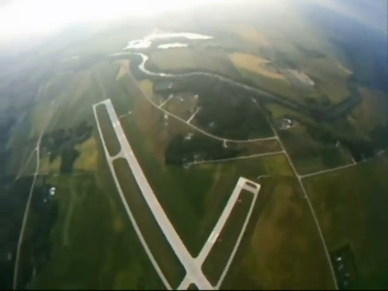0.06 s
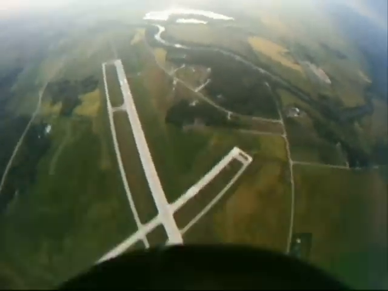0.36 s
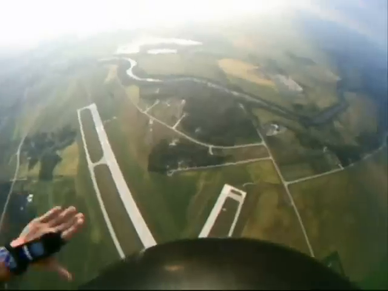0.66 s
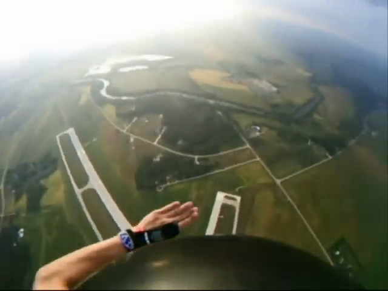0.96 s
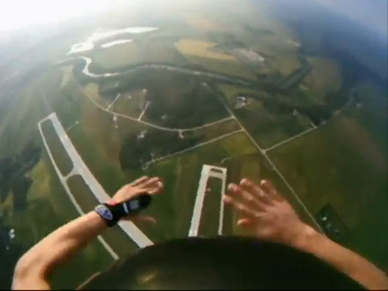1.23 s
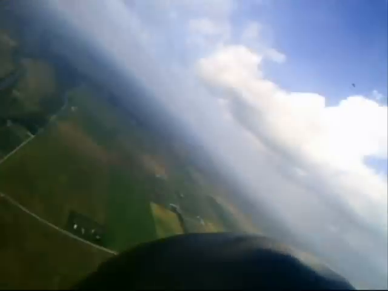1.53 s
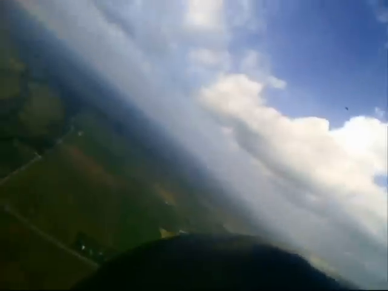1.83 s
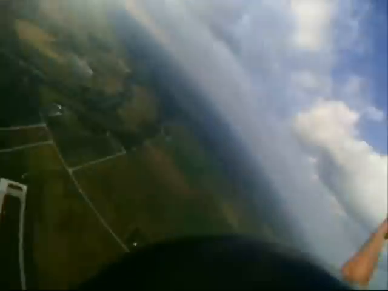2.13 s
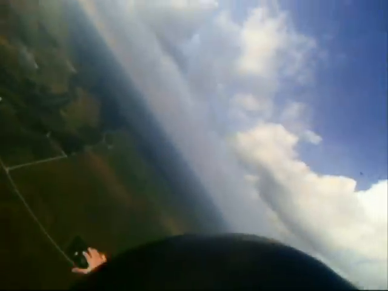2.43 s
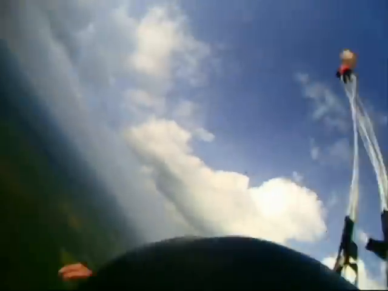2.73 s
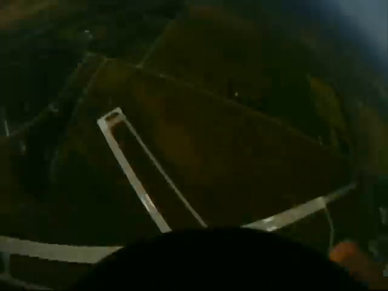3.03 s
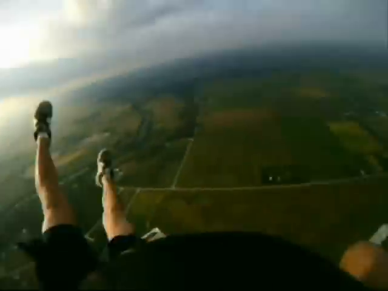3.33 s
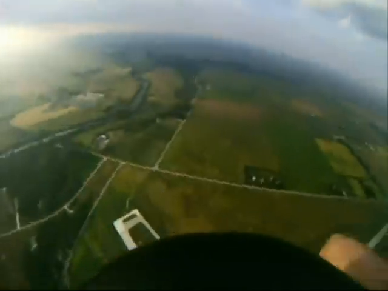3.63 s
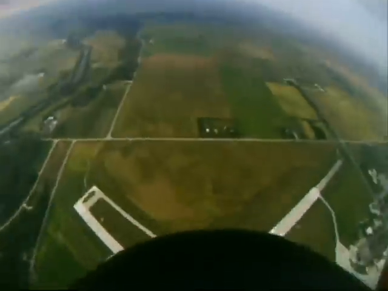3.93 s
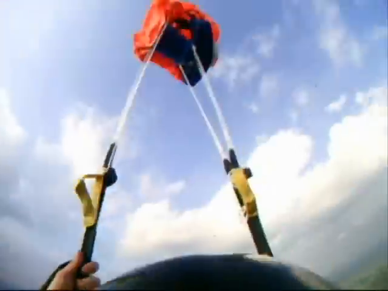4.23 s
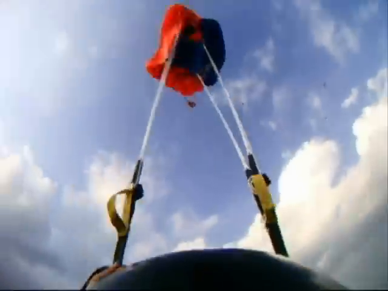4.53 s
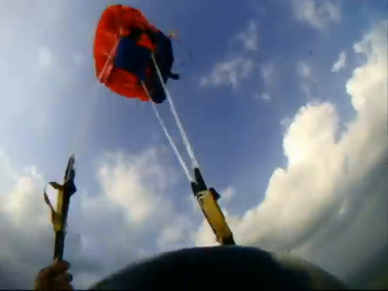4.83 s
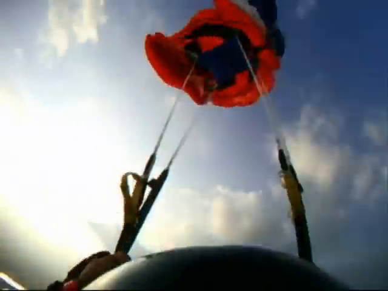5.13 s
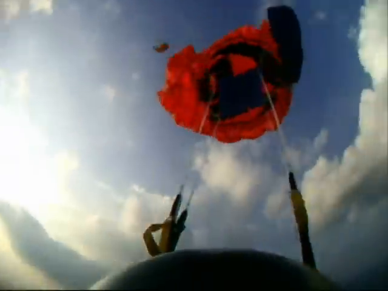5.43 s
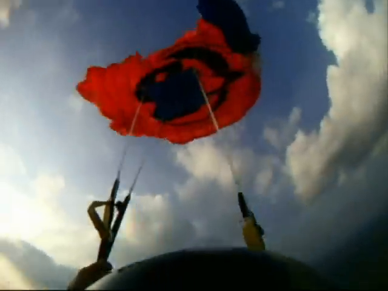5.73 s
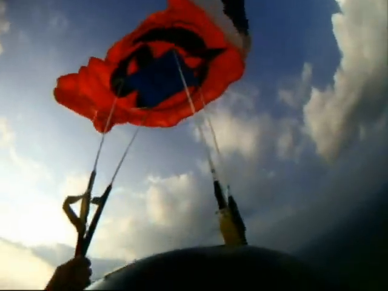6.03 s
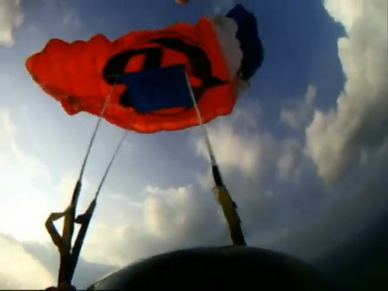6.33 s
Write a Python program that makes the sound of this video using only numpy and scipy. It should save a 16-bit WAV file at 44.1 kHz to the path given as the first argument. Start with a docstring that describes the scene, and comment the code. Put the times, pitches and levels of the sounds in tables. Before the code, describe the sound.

Freefall wind roars, thumps and hisses across a helmet microphone, fading to a low flutter as a parachute canopy opens.

```python
"""Freefall wind tears across a helmet microphone, then dies down as the parachute opens.
Turbulence is fluctuating pressure: large eddies thump the microphone, small ones roar and hiss through
its housing, and the hardest gusts overload it for milliseconds. Slaps of air come early in the fall
and with the opening jolt. At the end the riser fittings clink and the spreading canopy crackles."""
import sys
import numpy as np
from scipy import signal
from scipy.fft import rfft, irfft
from scipy.io import wavfile
from scipy.ndimage import uniform_filter1d

SR = 44100
rng = np.random.default_rng(int(sys.argv[2]) if len(sys.argv) > 2 else 0)


def waveform_to_disk(signal):
    """Save audio, clipped to [-1, 1], as 16-bit WAV at the path in sys.argv[1]."""
    frames = np.transpose(np.atleast_2d(signal))
    scaled = np.clip(frames, -1, 1) * 32767
    samples = np.round(scaled).astype(np.int16)
    wavfile.write(sys.argv[1], SR, samples)


N = 281336
T = np.arange(N) / SR

# Levels in the tables are relative; each source adds its own gain.
# course of the fall: (t/s, pace of the large eddies as a factor, posture from 0 flat to 1 upright)
FALL_COURSE = [(0, 1.16, 0.037), (2.3, 1.02, 0.075), (3.0, 1.03, 0.2), (3.5, 1.024, 0.41),
               (4.0, 1.01, 0.88), (4.7, .95, 0.6), (5.2, 0.53, 0.79), (6.38, 0.71, 0.63)]
# air rushing past the microphone: (t/s, roar level/dB, hiss level/dB)
RUSH_LEVELS = [(0, -29.5, -19), (.3, -32, -20.5), (.53, -30.5, -16.5), (.8, -32.5, -30), (1.08, -42, -37.5),
               (1.3, -32.5, -25.5), (1.37, -38, -35), (1.48, -28.5, -22.5), (1.75, -33, -25.5),
               (2.0, -28, -22), (2.45, -35, -24.5), (2.92, -45, -25), (3.07, -27.5, -25), (3.28, -44, -35),
               (3.6, -47.5, -46.5), (4.45, -60.5, -58.5), (5.55, -71.5, -65.5), (6.38, -75.5, -73)]
# eddies in the body's wake: (t/s, slow buffet level/dB, quicker throb level/dB)
WAKE_LEVELS = [(0, -35, -32), (.27, -44, -33), (.45, -21.5, -24.5), (.75, -33.5, -30.5), (.97, -32, -25.5),
               (1.6, -41, -26.5), (1.71, -37, -33), (1.95, -26.5, -25), (2.25, -34, -29.5),
               (2.76, -40.5, -41.5), (3.1, -21.5, -25.5), (3.45, -26.5, -28.5), (3.64, -30.5, -42.5),
               (4.1, -36.5, -44.5), (4.8, -41, -47.5), (5.1, -48, -49.5), (5.55, -53, -62.5),
               (6.38, -58, -62)]
# noise spectra of the flow, the cloth and a slap's hiss: (f/Hz, spectral level/dB)
BUFFET_SPECTRUM = [(8, -13), (20, 5.5), (42, -4), (65, -4), (100, -16), (250, -51.5), (700, -92)]
THROB_SPECTRUM = [(30, -24.5), (60, -1), (90, -1), (130, -0.5), (185, -3.5), (250, -12), (400, -28),
                  (1200, -50), (4000, -87.5)]
ROAR_SPECTRUM = [(80, -23.5), (200, 3), (280, 2), (550, -3), (800, -5.5), (1100, -7.5), (1450, -3),
                 (2000, -17), (3000, -26.5), (8000, -35), (16000, -47)]
HISS_SPECTRUM = [(100, -33), (600, -9), (1100, -8), (1700, -2), (2700, 1.5), (3300, -5), (4500, -7),
                 (6400, -9), (7400, -20.5), (9000, -20.5), (12000, -17.5), (15000, -19), (16000, -30)]
CLOTH_SPECTRUM = [(300, -26), (1500, 1.5), (3000, 1.5), (4200, 0.5), (6000, -9), (8000, -3.5), (10000, -19),
                  (13000, -9), (16000, -22)]
SPIT_SPECTRUM = [(300, -18), (900, 4.5), (1150, -12.5), (1700, -1), (2700, 0.5), (3500, -12.5), (6400, -9),
                 (8000, -17.5), (12000, -22), (15000, -17.5), (16000, -23)]
# resonances and notches of the microphone housing: (f/Hz, width/Hz, gain/dB)
HOUSING_RESPONSE = [(373, 85, 1.5), (896, 150, 3), (1540, 490, 2.5), (1970, 290, 3.5), (2378, 230, 6),
                    (4003, 320, -5.5), (5570, 670, 5.5), (8060, 170, -6), (10140, 2000, 9.5),
                    (10420, 200, 3.5), (12000, 280, 0), (13500, 220, 2), (13800, 2000, 6.5)]
# modes of the helmet's hollow, the air in the port and the riser fittings: (f/Hz, width/Hz, level/dB)
HELMET_MODES = [(159, 23, 3.5), (364, 32, -10.5), (419.4, 28, -0.5), (920, 74, -5)]
PORT_MODES = [(1980, 580, 0), (5700, 800, -10), (10250, 1400, -16.5), (13900, 900, -19.5)]
FITTING_MODES = [(3360, 230, 6), (4600, 260, -2), (5080, 360, -7), (10900, 900, -8), (12500, 900, -8)]
# impulses of air, cloth and fittings: (t/s, level/dB)
AIR_SLAPS = [(.3574, 0), (.461, -23), (.4743, 8), (.595, 0.5), (2.0535, -11), (2.063, -9), (3.0745, -9.5),
             (3.11, -9), (3.146, -4.5), (3.257, -15), (3.2912, -10.5), (3.312, -12.5), (3.3358, -6.5),
             (3.418, -19), (3.478, -12), (3.4897, -11.5), (3.4994, -14), (3.519, -15.5), (3.7145, -24),
             (3.7636, -13), (3.7911, -16), (3.8246, -32), (3.8561, -23.5), (3.9668, -23.5), (4.071, -26.5),
             (4.1915, -28.5), (4.3059, -27.5), (4.634, -29), (5.1924, -40), (5.2126, -33.5)]
CLOTH_CRACKS = [(5.6044, -52), (5.6535, -50), (5.7056, -46.5), (5.8317, -60), (5.9423, -44), (5.9677, -47),
                (6.0477, -49), (6.103, -49), (6.1432, -50), (6.1928, -46), (6.336, -49.5)]
FITTING_TAPS = [(5.48, -52), (5.4965, -46)]
# swells from large eddies and from the billowing canopy: (centre t/s, duration/s, lift/dB)
EDDY_GUSTS = [(.305, 0.034, 8), (.36, 0.08, 7), (.475, 0.024, 4), (.565, .04, 12.5), (.625, 0.024, 7),
              (1.0, 0.039, -3), (1.28, 0.2, 3.5), (1.84, 0.36, 4), (2.06, 0.021, 7.5), (2.13, 0.028, 4.5),
              (2.89, 0.055, 7.5), (3.075, 0.033, 1.5), (3.17, 0.029, 5), (3.49, 0.055, 6.5), (3.81, .09, 7),
              (4.36, 0.068, 3.5), (4.51, 0.023, 6), (5.23, 0.076, 9.5), (4.66, .06, 0.5), (5.37, 0.11, 5.5)]
CANOPY_BILLOWS = [(3.355, 0.075, 8.5), (3.495, 0.014, 3), (3.78, 0.022, 10.5), (3.92, 0.039, 2),
                  (3.98, 0.055, 5.5), (4.07, 0.034, 4.5), (4.24, 0.045, 7), (4.315, .035, 8),
                  (4.57, 0.031, 10), (4.65, 0.045, 13.5), (4.75, 0.041, 12), (4.81, 0.061, 12.5),
                  (4.87, 0.021, 9.5), (4.97, 0.06, 6), (5.215, 0.029, 3)]
# gusts that choke the microphone: (t/s, duration/s, jolt/full scale)
OVERLOADS = [(0.3578, 0.0084, 1), (0.449, 0.008, 0.037), (.474, 0.013, -0.64), (0.555, 0.0075, .45),
             (0.576, 0.017, -0.051), (0.595, 0.014, -0.21), (0.641, 0.011, 0.33), (2.039, 0.0046, 0.31),
             (3.147, 0.0087, -0.17), (3.294, 0.0081, -0.012)]

# bands in which noise is normalised: (lowest f/Hz, highest f/Hz)
BASS, LOW, MIDDLE, TREBLE = (20, 70), (70, 250), (300, 1100), (1500, 16000)


def amp(db):
    """Amplitude ratio of a level in decibels."""
    return 10 ** (np.asarray(db) / 20)


def unit(x):
    """Normalisation to an rms of 1."""
    return x / np.sqrt(np.mean(x ** 2) + 1e-20)


def curve(rows):
    """Linear interpolation in time of each column of a table."""
    times, *columns = np.transpose(rows)
    return [np.interp(T, times, column) for column in columns]


def swells(rows):
    """Sum of Gaussian lifts in dB, each duration being the width at half height."""
    return sum(db * 2 ** -(2 * (T - s) / length) ** 2 for s, length, db in rows)


def bursts(rows, rise_s, decay_s):
    """Superposed envelopes of sudden onset and exponential decay."""
    envelope = np.zeros(N)
    t = np.arange(SR // 8) / SR
    shape = (1 - np.exp(-(t / rise_s) ** 2)) * np.exp(-t / decay_s)
    for s, db in rows:
        part = envelope[round(s * SR):][:len(t)]
        part += amp(db) * shape[:len(part)] / shape.max()
    return envelope


def scatter(per_s):
    """Poisson process with normally distributed sizes: (t/s, size/standard deviations)."""
    hit = rng.random(N) < per_s / SR
    return zip(T[hit], rng.standard_normal(N)[hit])


def wander(rate_hz):
    """Band-limited random modulation of rms 1, falling off above the given rate."""
    hz = np.fft.rfftfreq(N, 1 / SR)
    gain = hz / (hz + 12) / np.sqrt(1 + (hz / rate_hz) ** 4)
    return unit(irfft(rfft(rng.standard_normal(N)) * gain, N))


def steadied(x, seconds):
    """Division by the running rms evens out chance swells."""
    return x / np.sqrt(uniform_filter1d(x ** 2, int(seconds * SR)) + 1e-6)


def turbulence(spectrum, band):
    """Source and filter: random pressure coloured by the housing, with rms 1 inside the band."""
    hz = np.fft.rfftfreq(N, 1 / SR)
    points, levels = np.transpose(spectrum)
    db = np.interp(np.log(hz + 1), np.log(points), levels)
    for centre, width, boost in HOUSING_RESPONSE:
        db = db + boost * 2 ** -(2 * (hz - centre) / width) ** 2
    coloured = rfft(rng.standard_normal(N)) * amp(db) * (hz > 0)
    inside = (hz >= band[0]) & (hz <= band[1])
    return irfft(coloured, N) / np.std(irfft(coloured * inside, N))


def ringing(modes):
    """Resonance: noise shaped by a Lorentzian peak for each mode, with rms 1."""
    hz = np.fft.rfftfreq(N, 1 / SR)
    gain = sum(amp(db) / np.sqrt(width) / (1 + ((hz - centre) / (0.74 * width)) ** 2)
               for centre, width, db in modes)
    return unit(irfft(rfft(rng.standard_normal(N)) * gain, N))


def riser_clinks():
    """Impact excites the damped modes of the fittings as they tap together."""
    tone = steadied(ringing(FITTING_MODES), seconds=0.005)
    return amp(-5) * tone * bursts(FITTING_TAPS, rise_s=0.00085, decay_s=0.0049)


def canopy_cracks():
    """Impulsive radiation: loose cloth whips taut in thin cracks among fainter random ticks."""
    ticks_from_s, tick_db, spread_db = 5.0, -57.5, 3.5
    ticks = [(s, tick_db + spread_db * size) for s, size in scatter(per_s=26) if s > ticks_from_s]
    cloth = steadied(turbulence(CLOTH_SPECTRUM, TREBLE), seconds=0.002)
    return amp(-7.5) * cloth * bursts(CLOTH_CRACKS + ticks, rise_s=0.00078, decay_s=0.0023)


def air_slaps():
    """Impulse excitation: an eddy breaks on the port and rings the air in it and in the helmet."""
    _, upright = curve(FALL_COURSE)
    blow = bursts(AIR_SLAPS, rise_s=0.00073, decay_s=0.0032)
    spit = amp(-13) * steadied(turbulence(SPIT_SPECTRUM, TREBLE), seconds=0.0018) * blow
    ping = amp(-14.5) * steadied(ringing(PORT_MODES), seconds=0.0023) * blow
    knock = amp(-16.5) * steadied(turbulence(ROAR_SPECTRUM, MIDDLE), seconds=0.005) * blow
    shove = amp(-7.5) * np.tanh(wander(rate_hz=15)) * bursts(AIR_SLAPS, rise_s=0.003, decay_s=0.0064)
    ring_envelope = bursts(AIR_SLAPS, rise_s=0.0024, decay_s=0.0065)
    helmet_ring = amp(-11.5) * upright * ringing(HELMET_MODES) * ring_envelope
    dulling = amp(-upright)  # 1 dB less treble when fully upright
    return (spit + ping) * dulling + knock + shove + helmet_ring


def helmet_lee(hiss, at_s=1.08, length_s=0.2, dip_db=-6, band_hz=(1900, 5900)):
    """Flow shielding: head down, the microphone sits in the helmet's lee and the hiss goes hollow."""
    bite = signal.sosfiltfilt(signal.butter(2, band_hz, "bandpass", fs=SR, output="sos"), hiss)
    return hiss + bite * (amp(swells([(at_s, length_s, dip_db)])) - 1)


def wind_hiss(upright):
    """Fine turbulence makes the treble; cloth fluttering overhead joins as the body swings upright."""
    air = amp(-3.5 * upright) * turbulence(HISS_SPECTRUM, TREBLE)
    cloth = amp(-4.5) * upright * turbulence(CLOTH_SPECTRUM, TREBLE)
    return helmet_lee(air + cloth)


def wind_roar(upright):
    """Cavity resonance: upright, air streams up past the helmet and hollow tones displace the roar."""
    hollow = steadied(ringing(HELMET_MODES), seconds=0.044)
    broad = turbulence(ROAR_SPECTRUM, MIDDLE)
    return np.sqrt(1 - 0.64 * upright) * broad + amp(5) * np.sqrt(upright) * hollow


def wake_buffet(pace):
    """Convection: the frequencies of the large eddies scale with the pace at which they pass."""
    pressure = turbulence(BUFFET_SPECTRUM, BASS)
    convected = np.interp(np.cumsum(pace) % N, np.arange(N), pressure)
    return steadied(convected, seconds=0.072)


def wake_lumps(upright, depth_db=1.4):
    """Intermittency: the wake arrives in lumps, a gain whose depth in dB doubles when upright."""
    return unit(amp(depth_db * (1 + upright) * wander(rate_hz=14)))


def rush_flutter(buffet, upright, flat_db=1.28, upright_db=3, sway_db=0.72):
    """Amplitude modulation in dB: passing eddies shake the rush, more so upright, over a slow sway."""
    depth_db = flat_db + (upright_db - flat_db) * upright
    flutter = unit(0.5 * buffet + wander(rate_hz=110) + 0.6 * wander(rate_hz=500))
    return depth_db * flutter + sway_db * wander(rate_hz=3.4)


def wind():
    """Turbulent pressure: large eddies push on the microphone and modulate the noise of small ones."""
    buffet_db, throb_db = curve(WAKE_LEVELS)
    roar_db, hiss_db = curve(RUSH_LEVELS)
    pace, upright = curve(FALL_COURSE)
    buffet = wake_buffet(pace)
    throb = steadied(turbulence(THROB_SPECTRUM, LOW), seconds=0.11)
    flutter_db = rush_flutter(buffet, upright)
    # gusts lift the bass and the roar, billows all but the deepest buffeting
    gust_db, billow_db = swells(EDDY_GUSTS), swells(CANOPY_BILLOWS)
    buffet = buffet * amp(buffet_db + gust_db + 5)
    throb = throb * amp(throb_db + 0.4 * gust_db + 0.63 * billow_db - 3.2 * upright)
    roar = wind_roar(upright) * amp(roar_db + 0.75 * gust_db + billow_db + 0.67 * flutter_db - 2.5)
    hiss = wind_hiss(upright) * amp(hiss_db + billow_db + flutter_db - 1.22)
    return (buffet + throb) * wake_lumps(upright) + roar + hiss


def scene():
    """Superposition of all sources at one microphone."""
    return (wind() + air_slaps() + canopy_cracks() + riser_clinks())[None]


def choke(x, drain_s=0.0021, recover_s=0.0033, rebound_s=0.0018, rebound_share=0.38, leak_db=-32):
    """Overload: the microphone goes deaf; its output jolts, drains, then swings back on recovery."""
    x = x.copy()
    t = np.arange(SR // 16) / SR
    drain = np.exp(-t / drain_s)
    for s, length, jolt in OVERLOADS:
        part = x[round(s * SR):][:len(t)]
        since_release = np.maximum(t - length, 0)
        deafness = (1 - drain) * np.exp(-(since_release / recover_s) ** 2)
        rebound = since_release / rebound_s * np.exp(1 - since_release / rebound_s)
        part *= 1 - deafness * (1 - amp(leak_db))
        part += jolt * (drain - rebound_share * rebound)
    return x


def record(dry):
    """Saturation and band limiting: the microphone chokes, limits at full scale and is low-passed."""
    cutoff_hz = 15700
    saturated = np.clip(choke(dry[0]), -1, 1)
    low_pass = signal.firwin(401, cutoff_hz, window=("kaiser", 8), fs=SR)
    return signal.oaconvolve(saturated, low_pass, "same")[None]


dry = scene()
out = record(dry)
waveform_to_disk(out)
```